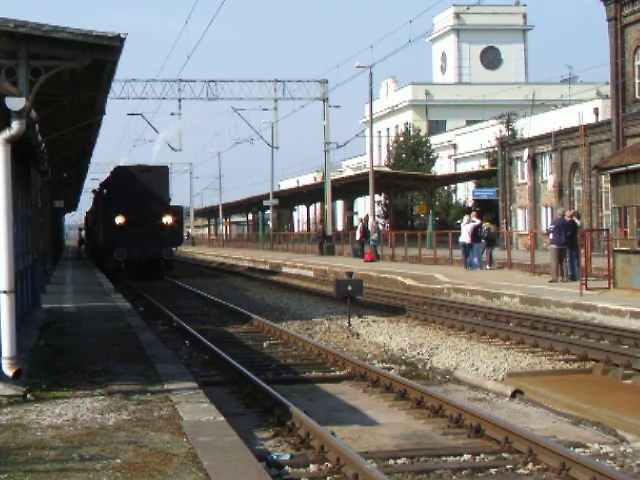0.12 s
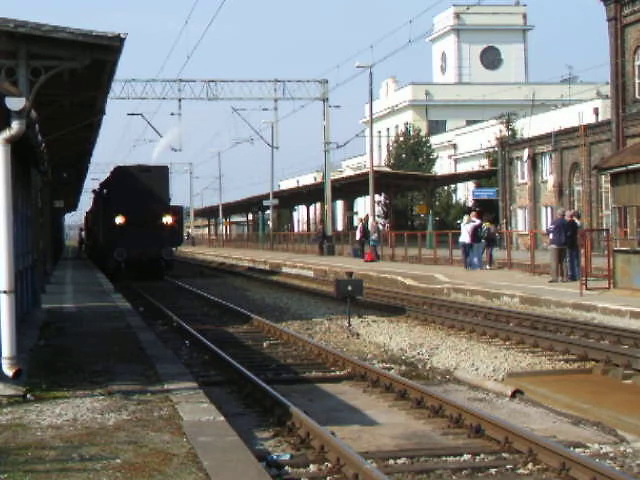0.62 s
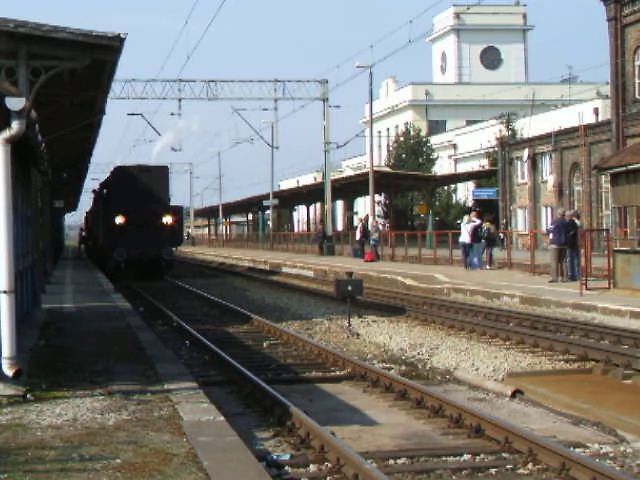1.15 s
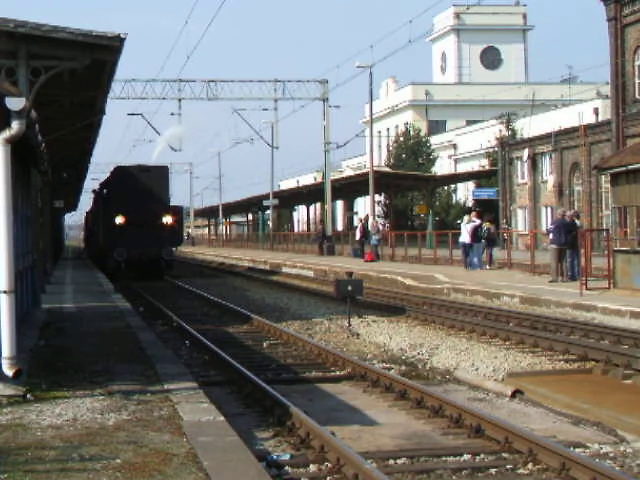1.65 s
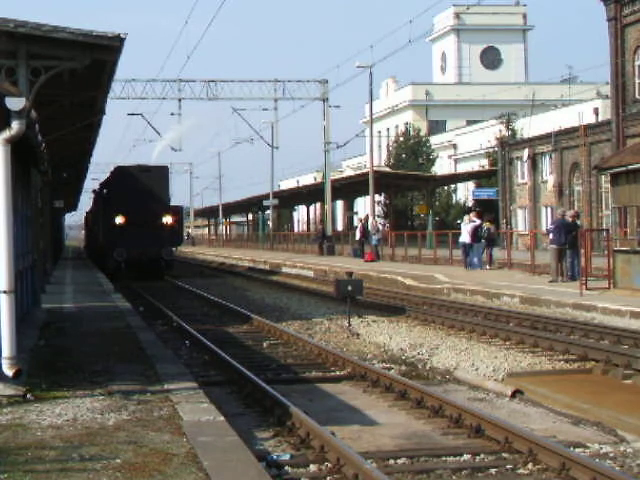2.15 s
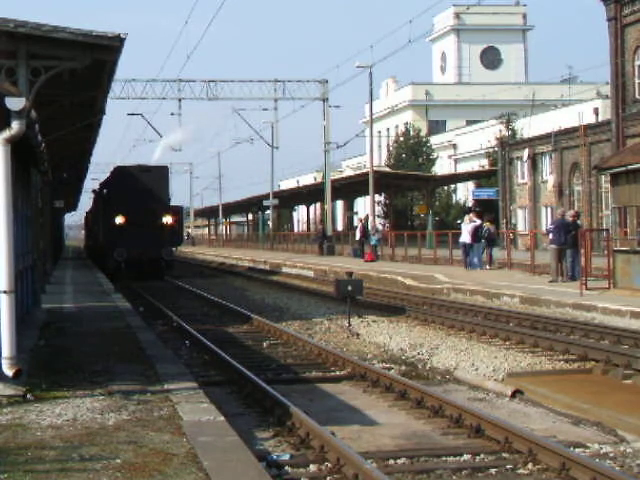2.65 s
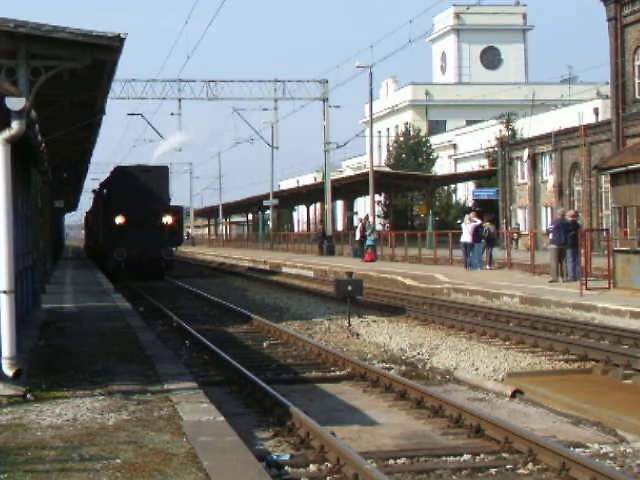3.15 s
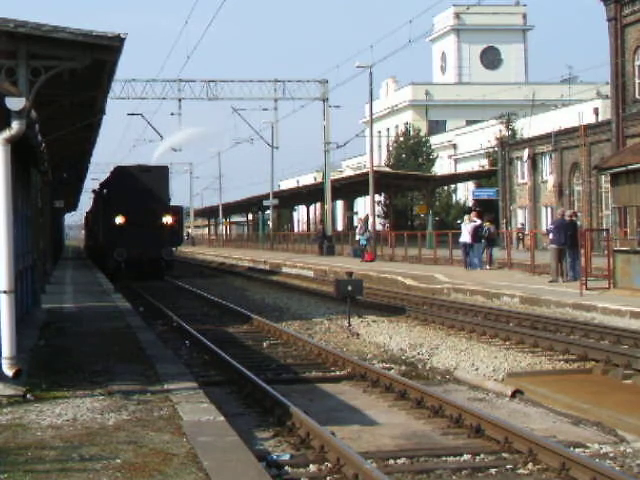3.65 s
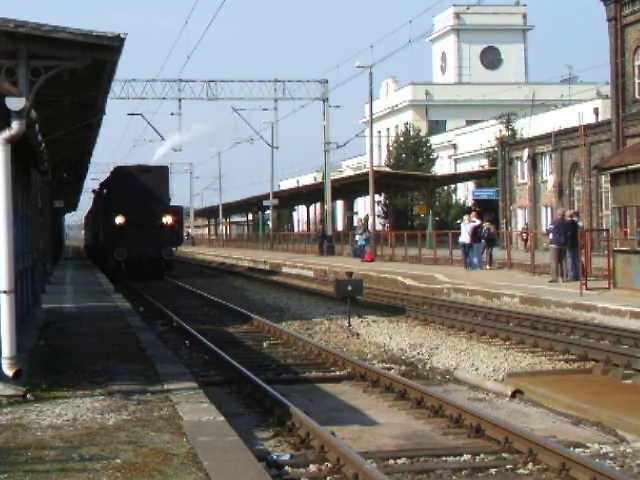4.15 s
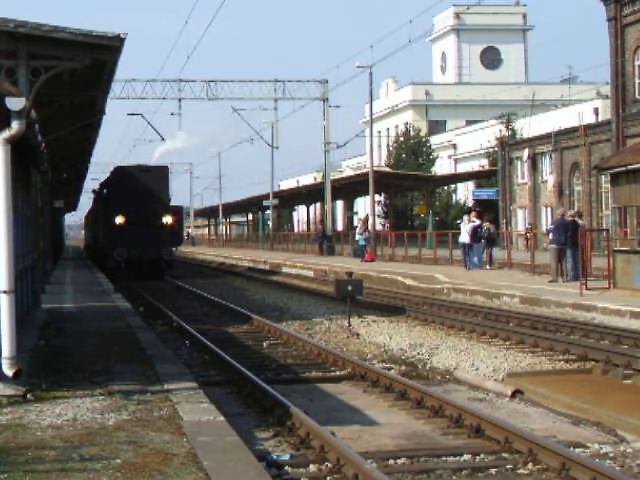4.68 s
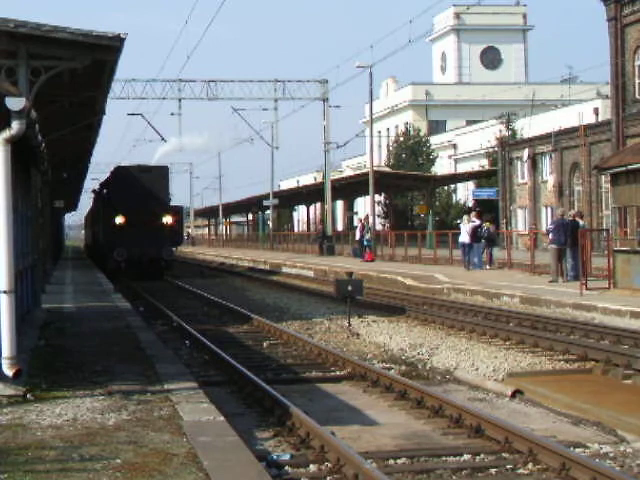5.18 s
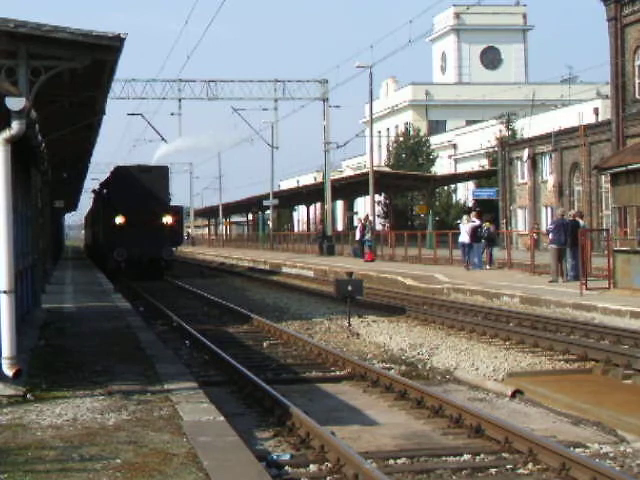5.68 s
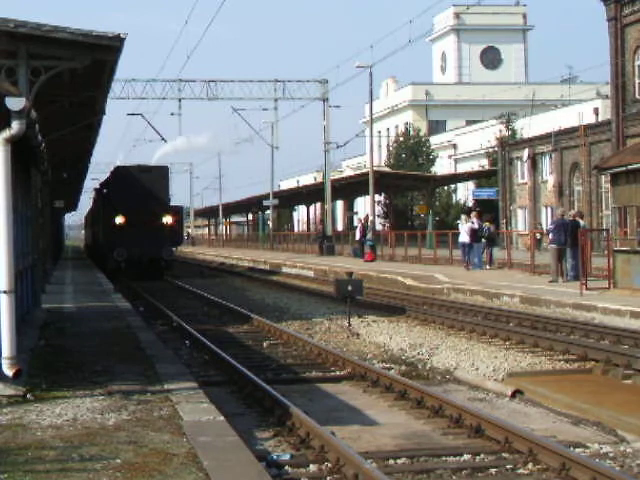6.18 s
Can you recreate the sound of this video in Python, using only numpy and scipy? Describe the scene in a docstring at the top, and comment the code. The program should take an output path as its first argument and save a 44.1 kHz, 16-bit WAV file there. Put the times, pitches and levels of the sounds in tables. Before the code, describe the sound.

A standing steam locomotive's pump puffs in a slow, uneven beat over faint hissing steam, while wind thumps and buffets the microphone.

```python
"""Steam locomotive air pump at a station

A steam locomotive stands far down a platform; its air pump exhausts in an uneven two-stroke beat.
Each puff is shaped noise: a hiss notched by reflections close by, a lower roar, and an echo off the station.
Leaking steam is a wavering hiss; wind is two bands of lumpy noise, with short rounded swings,
swelling and fading evenly, for its thumps."""
import sys
import numpy as np
from scipy import signal
from scipy.fft import rfft, irfft, next_fast_len
from scipy.io import wavfile
from scipy.ndimage import uniform_filter1d, map_coordinates

SR = 44100
rng = np.random.default_rng(int(sys.argv[2]) if len(sys.argv) > 2 else 0)


def attenuation_scalar(level_db):
    """Turn a level in dB into a linear amplitude multiplier (20 dB per decade)."""
    decades = np.asarray(level_db, float) / 20
    return 10 ** decades


def inscribe(sig):
    """Save sig as 16-bit PCM at rate SR to the path in sys.argv[1].

    A 1-D sig is mono; a 2-D sig holds one channel per row.
    Samples are clipped to [-1, 1] before scaling.
    """
    pcm = np.round(np.clip(np.atleast_2d(sig).T, -1, 1) * 32767)
    wavfile.write(sys.argv[1], SR, pcm.astype(np.int16))


N = 278226


def unit(x):
    """x at rms 1."""
    return x / np.sqrt(np.mean(x ** 2) + 1e-20)


def along(points, hz):
    """(Hz, value) points read on a log frequency axis."""
    point_hz, value = np.transpose(points)
    return np.interp(np.log(hz + 1), np.log(point_hz + 1), value)


def curves(rows):
    """One value per sample for each column after the time."""
    s, *columns = np.transpose(rows)
    return [np.interp(np.arange(N) / SR, s, column) for column in columns]


def wobble(knots_per_s, size=N):
    """A smooth random curve."""
    knots = rng.standard_normal(int(size * knots_per_s / SR) + 4)
    return map_coordinates(knots, [np.arange(size) * knots_per_s / SR])


def noise(spectrum, size=N):
    """Coloured noise of rms 1."""
    m = next_fast_len(size)
    gain = attenuation_scalar(along(spectrum, np.fft.rfftfreq(m, 1 / SR)))
    return unit(irfft(rfft(rng.standard_normal(m)) * gain, m)[:size])


def add(track, sound, s):
    """Mix a sound into the track from time s."""
    start = round(s * SR)
    part = sound[max(-start, 0):N - start]
    track[max(start, 0):][:len(part)] += part


def pump():
    """Each exhaust stroke bursts open, blows down with the steam pressure, then chokes off."""
    # Each row: start in s, burst level in dB, burst length in s, blow-down level in dB,
    # blow-down peak in s after the start, treble tilt in dB per octave, roar and echo trim in dB.
    puffs = [(-.11, -17.5, 0.031, -25, 0.082, -4.5, 1), (0.67, -16, 0.04, -19.5, 0.082, -5.5, -0.5),
             (1.327, -14.5, 0.038, -23.5, 0.12, 4.5, 1), (2.123, -14.5, 0.038, -24, 0.1, 4, -1),
             (2.775, -15.5, 0.023, -21, 0.11, 1, -0.5), (3.565, -15, 0.017, -21, 0.082, 3, 0),
             (4.215, -15.5, 0.028, -21.5, 0.089, 6, -0.5), (4.963, -17, 0.033, -21.5, 0.078, 7, 0.5),
             (5.603, -17.5, 0.024, -20.5, 0.056, 2, 1.5)]
    # The air bends the reflected path per stroke. Each row: notch depth in dB, notch pitch ratio.
    bends = [(2, 1.06), (9, .97), (9, 1.01), (7, 1), (5, 1), (10, .99), (9, .97), (3, 1.03), (3, 1.12)]
    # Ground and platform reflections cancel the direct sound.
    # Each row: centre in Hz at pitch ratio 1, share of the notch depth.
    cancellations = [(2200, .8), (3780, .9), (5850, 1.1)]
    # Hiss of the steam jet. Each row: frequency in Hz, relative density in dB per Hz.
    jet_spectrum = [(1000, -45), (1800, -15.5), (2500, -8), (3150, -1.25), (4500, 1.4), (6200, 0.8),
                    (7900, -4.5), (8600, -20.5), (12000, -28.5)]
    # Lower roar of the jet. Each row: frequency in Hz, relative density in dB per Hz.
    roar_spectrum = [(400, -30), (900, -14.5), (1250, -4), (1800, -3), (2400, -7), (3500, -40)]
    open_s = 0.007
    burst_sag_db_per_s, burst_end_db_per_s = 63, 499.5
    blow_rise_s, blow_fall_s = 0.094, 0.096
    echo_db = -3.5

    track, t = np.zeros(N), np.arange(SR // 2) / SR
    size = len(t)
    opening = np.clip(t / open_s, 0, 1) ** 1.7
    # roar over hiss: a pop at the opening, then growth as pressure falls
    roar_db = -24 + 12 * np.exp(-t / 0.016) + 70.5 * t
    for puff, (notch_db, ratio) in zip(puffs, bends):
        s, burst_db, burst_s, blow_db, peak_s, tilt_db, low_db = puff
        blow_width_s = np.where(t < peak_s, blow_rise_s, blow_fall_s)
        blow_down = attenuation_scalar(blow_db) * np.exp(-((t - peak_s) / blow_width_s) ** 2)
        ending_db = burst_end_db_per_s * np.maximum(t - burst_s, 0)
        burst = attenuation_scalar(burst_db - burst_sag_db_per_s * t - ending_db)
        flutter = attenuation_scalar(0.4 * wobble(64, size) + 1.43 * wobble(353.7, size))  # turbulent jet
        level = opening * flutter * np.hypot(burst, blow_down)
        hiss = patchy(noise(jet_spectrum, size), depth_db=1.5)
        roar = attenuation_scalar(roar_db + low_db) * noise(roar_spectrum, size)
        notches = [(hz * ratio, share * notch_db) for hz, share in cancellations]
        direct = level * (combed(hiss, notches, tilt_db, width_hz=270) + roar)
        add(track, direct, s)
        echo = signal.fftconvolve(level * (hiss + roar), station(air_db_per_s=10))
        add(track, attenuation_scalar(echo_db + low_db) * echo, s)
    return track


def patchy(x, depth_db):
    """Turbulent unevenness: random patches of gain, about 700 Hz by 40 ms."""
    z = signal.stft(x, nperseg=512)[2]
    field = uniform_filter1d(rng.standard_normal(z.shape), size=8, axis=0)
    field = unit(uniform_filter1d(field, size=7, axis=1))
    return unit(signal.istft(z * attenuation_scalar(depth_db * field), nperseg=512)[1][:len(x)])


def combed(jet, notches, tilt_db, width_hz):
    """Direct path: narrow cancellations by reflections and a treble tilt above 5 kHz, at rms 1."""
    hz = np.fft.rfftfreq(len(jet), 1 / SR)
    loss_db = sum(db * np.exp(-((hz - centre_hz) / width_hz) ** 2) for centre_hz, db in notches)
    slope_db = tilt_db * np.log2(np.maximum(hz / 5000, 1))
    return unit(irfft(rfft(jet) * attenuation_scalar(slope_db - loss_db), len(jet)))


def station(air_db_per_s):
    """Scattered answer of canopy and walls; air loss is given at 5 kHz and grows as frequency squared."""
    # Groups of reflecting walls. Each row: delay in s, level in dB, t60 in s before air loss.
    walls = [(0.017, -2.5, 0.74), (0.106, -0.3, 0.3), (.24, -0.1, 0.31), (.35, -0.5, 0.15), (.15, -8, 1.17)]
    # Colour of the reflections. Each row: frequency in Hz, gain in dB before air loss.
    wall_colour = [(500, 14), (1000, 1.5), (2000, 6), (3500, -0.5), (6000, -2.5), (9000, -4.5)]
    hz, t, z = signal.stft(rng.standard_normal(SR), SR, nperseg=256)
    power = sum((t > s) * attenuation_scalar(db - 60 * (t - s) / t60) ** 2 for s, db, t60 in walls)
    air_loss_db = air_db_per_s * t * (hz[:, None] / 5000) ** 2
    colour = attenuation_scalar(along(wall_colour, hz)[:, None] - air_loss_db)
    tail = signal.istft(z * np.sqrt(power) * colour, SR, nperseg=256)[1]
    return tail / np.sqrt(SR * 0.1)


def leak():
    """Steam escaping from valves and glands: broadband jet noise with a small random waver."""
    # Each row: frequency in Hz, relative density in dB per Hz.
    leak_spectrum = [(150, -43.5), (250, -17), (700, -7.5), (2250, -3.5), (4300, -0.5), (5300, -0.5),
                     (5850, -1.5), (6400, 0.5), (7600, 0.5), (8500, -14), (12000, -15)]
    # Each row: time in s, level in dB before a 3 dB lift.
    leak_levels = [(0, -33.5), (.4, -38), (.9, -37.5), (2.8, -40), (3.7, -38), (5.9, -38.5), (6.31, -40)]
    waver_db = 0.7 * wobble(6) + 0.7 * wobble(40)
    return attenuation_scalar(curves(leak_levels)[0] + 3 + waver_db) * noise(leak_spectrum)


def wind():
    """Lumpy turbulence over the microphone: faster air sheds smaller, higher eddies."""
    # Rumble that rises and falls between the buffets.
    # Each row: time in s, level in dB before the output trim, eddy speed 0-1.
    breeze_rows = [(0, -54, .8), (1, -55, 1), (1.4, -58, 0.6), (1.7, -45.5, 0.27), (2.15, -38.5, 0.4),
                   (2.3, -29.5, 0.63), (2.68, -35.5, 0.5), (2.78, -45.5, 0.34), (3.3, -48, .4),
                   (3.65, -39.5, 0.22), (3.95, -42, 0.44), (4.2, -46.5, .4), (4.8, -49, 0.4),
                   (4.95, -33.5, .3), (5.1, -53.5, 0.05), (5.35, -40, 0.66), (5.9, -38.5, 0.26),
                   (6.05, -46.5, 0.4), (6.31, -41, 0.34)]
    # Buffets. Each row: middle in s, half length in s, level in dB before the trim, eddy speed 0-1.
    gusts = [(.7, 0.023, -46, .2), (1.099, 0.035, -36.5, .1), (1.17, 0.029, -32, 0.5),
             (1.277, 0.06, -37, 0.03), (1.526, 0.026, -33.5, 0.5), (1.633, 0.04, -35, 0.4),
             (1.85, .03, -36, 0.4), (1.933, 0.056, -29.5, 0.5), (2.016, 0.036, -32, 0.8),
             (2.338, .04, -24, .9), (2.458, 0.04, -23, 1), (2.541, 0.024, -18.5, 0.9),
             (2.648, 0.053, -24.5, 0.8), (2.897, 0.057, -27.5, 0.33), (3.105, 0.062, -31.5, .1),
             (3.473, 0.044, -28.5, 0.13), (3.77, 0.021, -25.5, 0.5), (3.861, 0.029, -23.5, 1),
             (4.052, .02, -35.5, 0.6), (4.387, 0.035, -38.5, 0.17), (4.455, 0.017, -35.5, 0.13),
             (4.51, 0.015, -30, 0.46), (4.663, 0.019, -30.5, 0.1), (4.73, 0.013, -23, 0.37),
             (4.88, 0.025, -32, 0), (5.404, .03, -36, 0.3), (5.47, .02, -35, .7), (5.58, 0.044, -38, .7),
             (5.798, .04, -34, 0.2), (5.9, .04, -36, 0.5), (6.212, 0.021, -34, 0.08)]
    # Large eddies. Each row: frequency in Hz, relative density in dB per Hz.
    slow_air = [(10, -10.5), (30, -4.5), (70, -6.5), (115, -13.5), (300, -42), (600, -61)]
    # Small eddies. Each row: frequency in Hz, relative density in dB per Hz.
    fast_air = [(20, -12.5), (110, 4), (190, 0.5), (320, -8.5), (550, -19), (1000, -31.5), (2000, -82)]
    trim_db = -1.5

    middle_s, half_s, gust_db, gust_speed = np.transpose(gusts)[:, :, None]
    gust_power = attenuation_scalar(gust_db) ** 2 * np.exp(-2 * ((np.arange(N) / SR - middle_s) / half_s) ** 2)
    breeze_db, breeze_speed = curves(breeze_rows)
    breeze_power = attenuation_scalar(breeze_db) ** 2
    large_power = (1 - breeze_speed) * breeze_power + np.sum((1 - gust_speed) * gust_power, axis=0)
    small_power = breeze_speed * breeze_power + np.sum(gust_speed * gust_power, axis=0)
    slow = unit(attenuation_scalar(2.5 * wobble(24)) * noise(slow_air))
    fast = unit(attenuation_scalar(3.84 * wobble(60)) * noise(fast_air))
    return attenuation_scalar(trim_db) * (np.sqrt(large_power) * slow + np.sqrt(small_power) * fast)


def thumps():
    """A strong eddy pushes the microphone's diaphragm through about one swing."""
    # Each row: time in s, level in dB before a 1 dB cut, swing frequency in Hz.
    eddies = [(1.094, -22, 129), (1.167, -29, 131), (1.607, -27, 127), (1.892, -26.5, 119),
              (1.925, -21.8, 202), (2.028, -22.5, 148), (2.044, -23.5, 181), (2.249, -18, 173),
              (2.263, -18, 177), (2.289, -16.5, 161), (2.342, -10.5, 165), (2.372, -9, 231),
              (2.425, -18.5, 233), (2.447, -10.5, 188), (2.475, -12.5, 253), (2.535, -9, 310),
              (2.58, -20, 142), (2.632, -15.5, 260), (2.648, -13.5, 230), (2.672, -19.5, 172),
              (2.911, -19.5, 118), (3.107, -25.5, 101), (3.461, -20, 110), (3.773, -20.5, 133),
              (3.861, -10.5, 177), (4.057, -23.5, 140), (4.733, -27.5, 111), (4.857, -25, 120),
              (4.893, -22.5, 152), (4.945, -23, 201), (4.996, -26, 141), (5.352, -25.5, 129),
              (5.599, -26.5, 170), (5.783, -24, 138), (5.844, -29, 140), (6.204, -31, 110)]
    track, t = np.zeros(N), np.arange(-SR // 20, SR // 20) / SR
    turns = rng.uniform(0, 2 * np.pi, len(eddies))
    for (s, db, hz), turn in zip(eddies, turns):
        phase = 2 * np.pi * hz * t
        swing = np.cos(phase + turn) + 0.29 * np.cos(2.1 * phase + 3 * turn)
        # a steep edge adds treble, more in hard blows
        swing += attenuation_scalar(db) * 0.43 * np.cos(3.45 * phase + 5 * turn)
        push = np.exp(-np.abs(hz * t / 0.56) ** 3) * swing
        add(track, attenuation_scalar(db - 1) * push, s + t[0])
    return track


def scene():
    """All sources on one channel."""
    return (pump() + leak() + wind() + thumps())[None]


def low_pass(x):
    """Removes everything above the highest recorded frequency."""
    return signal.sosfilt(signal.butter(12, 9060, fs=SR, output="sos"), x)


def record(dry):
    """A small microphone input: soft saturation, a limited pass band, then a slight constant offset."""
    # Pass band. Each row: frequency in Hz, gain in dB.
    pass_band = [(20, 1.5), (8000, -1.5), (8600, -2.5), (9000, -22.5), (9250, -37), (9500, -110)]
    ceiling, offset = 0.56, -0.0024  # full scale = 1
    held = dry / (1 + np.abs(dry / ceiling) ** 6) ** (1 / 6)
    m = next_fast_len(N + SR // 10)
    gain = attenuation_scalar(along(pass_band, np.fft.rfftfreq(m, 1 / SR)))
    limited = irfft(rfft(held, m) * gain, m)[:, :N]
    return low_pass(limited + offset)


dry = scene()
out = record(dry)
inscribe(out)
```